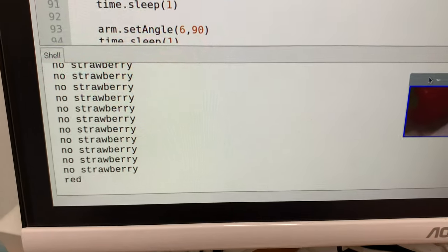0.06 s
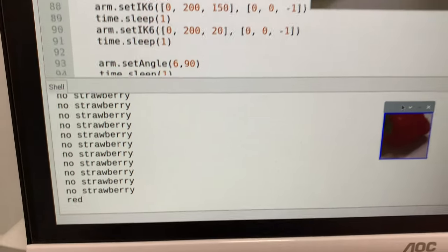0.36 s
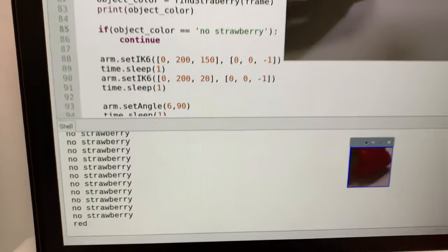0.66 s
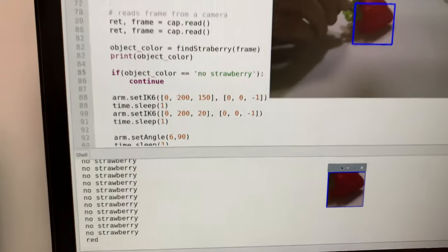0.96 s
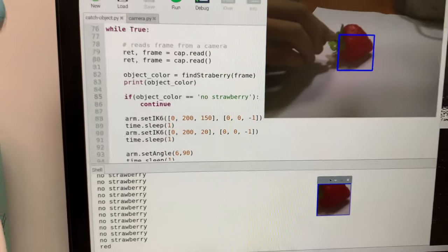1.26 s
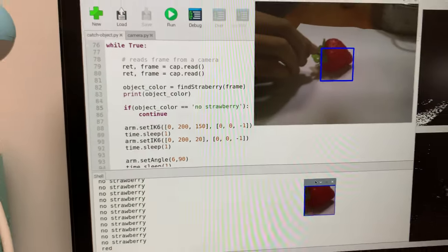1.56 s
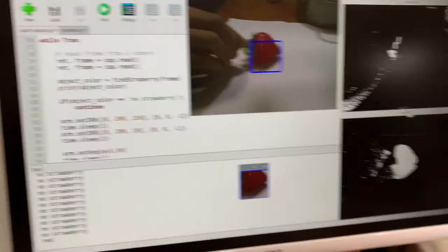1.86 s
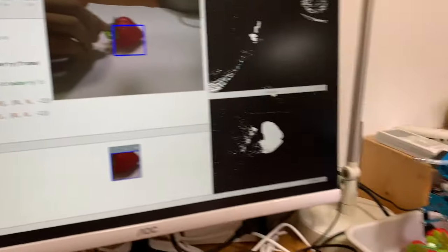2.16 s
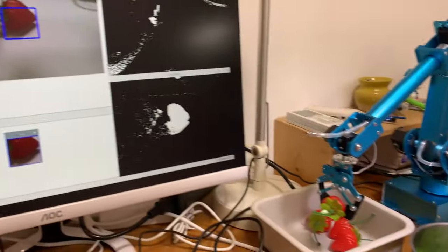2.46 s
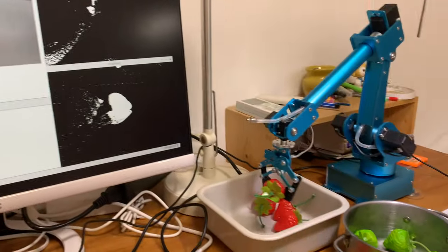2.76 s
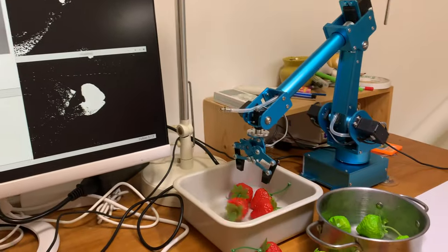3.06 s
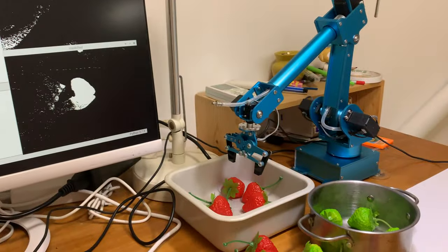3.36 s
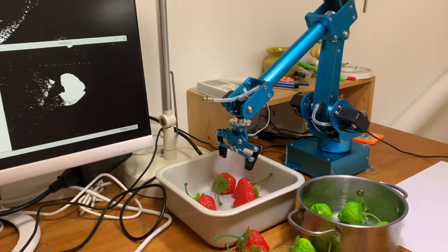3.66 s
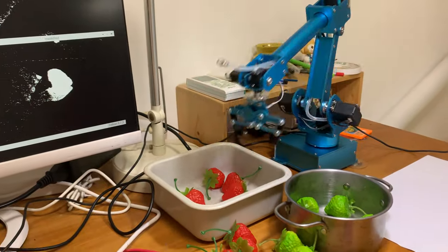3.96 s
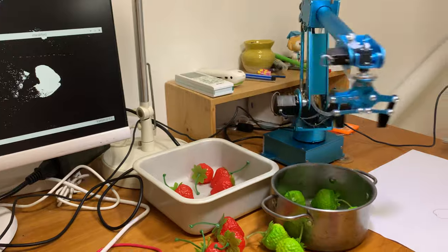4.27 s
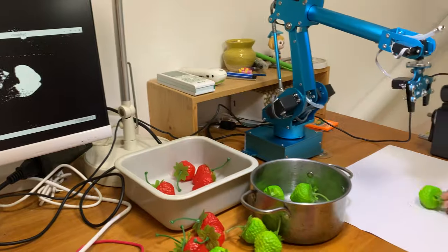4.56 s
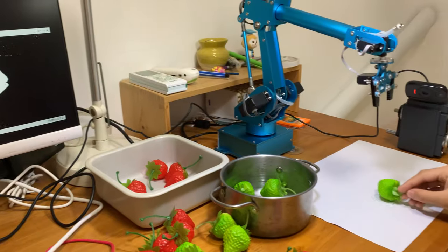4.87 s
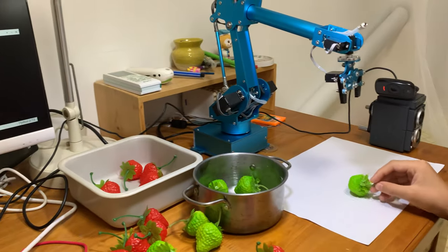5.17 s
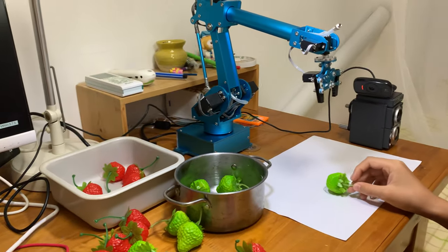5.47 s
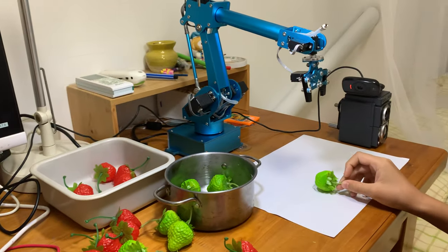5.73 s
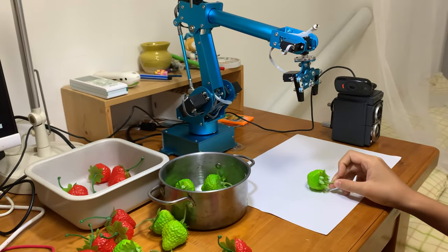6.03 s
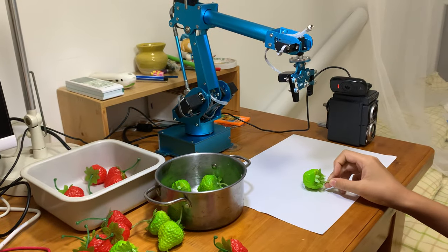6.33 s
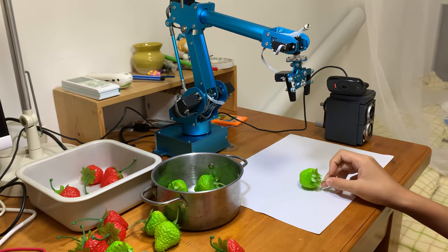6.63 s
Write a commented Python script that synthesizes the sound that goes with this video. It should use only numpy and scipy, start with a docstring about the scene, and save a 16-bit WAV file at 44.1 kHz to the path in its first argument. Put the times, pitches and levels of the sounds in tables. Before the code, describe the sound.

Small servo motors rasp and whine in three quick spurts as a metal robot arm moves on a desk, heard through a hand-held microphone over a steady indoor hum. A toy strawberry then lands in a plastic tub, the loudest sound, bouncing and rocking briefly. A fourth whir ends in a clunk from the arm's joints. After that the small room just hums, with thin, barely audible whistles from the motors.

```python
"""A small room with a low electric hum, where a small metal robot arm on a desk moves in four bursts.
Tooth impacts make its servo gears rasp, harmonics of the mesh rate make them whine, and servos holding
a load whistle faintly. The gripper opens and drops a toy strawberry into a plastic tub, which rings
over a low thump from the desk; the last swing ends in a clunk as the slack in the joints closes. Midway
the hand-held microphone turns towards the arm, with a soft brush of sleeve."""
import sys
import numpy as np
from scipy import signal
from scipy.fft import rfft, irfft, next_fast_len
from scipy.io import wavfile
from scipy.ndimage import uniform_filter1d

SR = 44100
rng = np.random.default_rng(int(sys.argv[2]) if len(sys.argv) > 2 else 0)


def bounce(signal):
    """Save signal as a 16-bit WAV file at the path given by the first command-line argument."""
    frames = np.transpose(np.atleast_2d(signal))
    limited = np.clip(frames, -1, 1)
    pcm = np.round(limited * 32767).astype(np.int16)
    wavfile.write(sys.argv[1], SR, pcm)


N = 304290
TIME = np.arange(N) / SR


def gain_of(db):
    """Amplitude ratio: a factor of ten for every 20 dB."""
    return 10 ** (np.asarray(db) / 20)


def unit_rms(x):
    """Normalisation to unit mean power."""
    return x / np.sqrt(np.mean(x ** 2) + 1e-20)


def curve(points, hz, column=1):
    """Interpolation of a table column on a logarithmic frequency axis."""
    table = np.transpose(points)
    return np.interp(np.log(hz + 1), np.log(table[0] + 1), table[column])


def add(mix, start, sound):
    """Superposition: a sound joins the mix at its start time."""
    part = mix[max(round(start * SR), 0):][:len(sound)]
    part += sound[:len(part)]


def colour(x, points, column=1):
    """Linear filtering: the spectrum is multiplied by a tabulated response."""
    size = next_fast_len(x.shape[-1] + 2048)
    response = gain_of(curve(points, np.fft.rfftfreq(size, 1 / SR), column))
    return irfft(rfft(x, size) * response, size)[..., :x.shape[-1]]


def drift(hz, size):
    """Random modulation: Gaussian noise of rms near 1, rolled off above hz."""
    f = np.fft.rfftfreq(next_fast_len(size + SR), 1 / SR)
    white = rfft(rng.standard_normal(2 * len(f) - 2))
    return unit_rms(irfft(white * np.exp(-(f / hz) ** 2)))[:size]


def ring(modes, rise_s=0.00021):
    """Free vibration: a struck body sounds as a sum of damped sinusoids, here scaled to peak 1."""
    t = np.arange(SR // 4) / SR
    sound = sum(gain_of(db - 60 * t / t60) * np.sin(2 * np.pi * hz * t) for hz, db, t60 in modes)
    sound *= 1 - np.exp(-t / rise_s)
    return sound / abs(sound).max()


def burst(spectrum, t60, rise_s=0.00017):
    """Modal overlap: countless close modes merge into decaying noise."""
    t = np.arange(SR // 4) / SR
    envelope = gain_of(-60 * t / t60) * (1 - np.exp(-t / rise_s))
    return colour(rng.standard_normal(len(t)) * envelope, spectrum)


# Room noise spectra facing a monitor and facing the arm: f/Hz, relative spectral level/dB
NOISE_AT_MONITOR = [(20, -28.5), (50, -9), (100, 1.5), (170, -3), (240, -14), (295, 0), (350, -16),
                    (430, -10), (620, -17.5), (1200, -23), (2500, -40.5), (5000, -51.5), (11500, -48.5),
                    (14000, -61.5)]
NOISE_AT_ARM = [(20, -46.5), (50, -1.5), (110, -1), (155, -12), (200, 1.5), (290, -3), (400, -10.5),
                (620, -17), (1200, -22.5), (2500, -43.5), (5000, -55), (11000, -51.5), (13800, -47.5),
                (15500, -51)]
# Likeness of the noise at left and right: f/Hz, coherence
COHERENCE = [(60, 0.84), (130, 0.85), (290, 0.68), (640, 0.37), (1410, 0.41), (3100, 0.071), (6820, 0.11),
             (15000, 0.53)]
# Noise contours, early and late: t/s, relative rumble level/dB, relative rush level/dB
NOISE_LEVELS = [
    [(0.0, -43, -59), (1.4, -45.5, -61.5), (1.75, -47, -59.5), (2.46, -45, -56.5), (2.84, -48.5, -61),
     (3.0, -49.5, -59)],
    [(4.85, -46, -56.5), (5.05, -44, -57.5), (5.614, -47.5, -59), (5.936, -43.5, -58),
     (6.158, -46.5, -59.5), (6.8, -46, -58)],
]
# Equipment hum: f/Hz, level facing the monitor/dB, level facing the arm/dB
HUM_LINES = [(50.6, -60.5, -66.5), (118, -58, -56), (256.7, -63, -53), (364, -65, -65.5)]


def room_noise(turn_start_s=1.81, turn_length_s=2.8, split_hz=470, wander_hz=2.497, waver_db=4):
    """Partly coherent noise and a line spectrum of hum change colour as the microphone turns."""
    turned = np.clip((TIME - turn_start_s) / turn_length_s, 0, 1)
    hz = np.fft.rfftfreq(N, 1 / SR)
    coherence = curve(COHERENCE, hz)
    low = 1 / (1 + (hz / split_hz) ** 8)
    times, rumble_db, rush_db = np.concatenate(NOISE_LEVELS).T
    out = np.zeros((2, N))
    for spectrum, share in ((NOISE_AT_MONITOR, 1 - turned), (NOISE_AT_ARM, turned)):
        left, independent = rfft(rng.standard_normal((2, N)))
        right = coherence * left + np.sqrt(1 - coherence ** 2) * independent
        noise = np.array([left, right]) * gain_of(curve(spectrum, hz))
        for band, db in ((low, rumble_db + 1), (1 - low, rush_db + 2)):
            out += np.sqrt(share) * gain_of(np.interp(TIME, times, db)) * unit_rms(irfft(noise * band, N))
    for f, monitor_db, arm_db in HUM_LINES:
        cycles = np.cumsum(f + wander_hz * drift(8, N)) / SR
        db = monitor_db + (arm_db - monitor_db) * turned + waver_db * drift(4, N)
        out += gain_of(db) * unit_rms(np.sin(2 * np.pi * cycles))
    return out * gain_of([[-.4], [.4]])


def tooth_impacts(cycles, slide=0.38, decay_cycles=.3, spread_db=3):
    """Impact and sliding friction: an envelope in which each tooth strikes with its own force."""
    forces = gain_of(spread_db * rng.standard_normal(int(cycles[-1]) + 1))
    return unit_rms(slide + forces[cycles.astype(int)] * np.exp(-(cycles % 1) / decay_cycles))


def mesh_harmonic(order, cycles):
    """Phase modulation: uneven tooth spacing smears a harmonic in proportion to its order."""
    smear = .085 * order * drift(300, len(cycles))
    return np.sqrt(2) * np.cos(2 * np.pi * (order * cycles + rng.random()) + smear)


def shifting_contact(x, depth_db=3.6, width_hz=520, length_s=0.065):
    """Time-varying excitation: shifting tooth contact favours changing patches of the spectrum."""
    spectra = signal.stft(x, SR, nperseg=512, noverlap=384)[2]
    patches = uniform_filter1d(rng.standard_normal(spectra.shape), int(width_hz * 512 / SR), axis=0)
    patches = uniform_filter1d(patches, int(length_s * SR / 128), axis=1)
    spectra *= gain_of(depth_db * unit_rms(patches))
    return signal.istft(spectra, SR, nperseg=512, noverlap=384)[1][:len(x)]


# Tone colour of the servo rasp as heard: f/Hz, gain/dB
RASP_COLOUR = [(400, -33), (1500, -14), (1950, 5), (2500, -5.5), (3200, 1.5), (3700, -14), (4250, -9.5),
               (4700, -6), (5400, -2.5), (7000, 3), (8500, -3.5), (10600, 5), (12500, -2), (15800, -4)]


def gear_rasp(cycles, harmonics_db=-2):
    """Source and filter: tooth noise and wavering high mesh harmonics share one tone colour."""
    harmonics = sum(gain_of(4 * drift(20, len(cycles))) * mesh_harmonic(k, cycles) for k in range(4, 16))
    grit = shifting_contact(rng.standard_normal(len(cycles))) * tooth_impacts(cycles)
    source = unit_rms(grit) + gain_of(harmonics_db) * unit_rms(harmonics)
    return unit_rms(colour(source, RASP_COLOUR))


# Partials of the whine: harmonic order, relative level/dB
WHINE_HARMONICS = [(2, -3.5), (3, 4.5), (4, -12), (5, -17.5)]


def gear_whine(cycles, harmonics=WHINE_HARMONICS, shimmer_db=1.5, shimmer_hz=39):
    """Periodic forcing: meshing teeth radiate harmonics of the mesh rate, each wavering in level."""
    return unit_rms(sum(gain_of(db + shimmer_db * drift(shimmer_hz, len(cycles))) * mesh_harmonic(k, cycles)
                        for k, db in harmonics))


# Moves of the arm: start t/s, run-up/s, braking t/s, rasp level/dB, whine level/dB, fractional flutter
ARM_MOVES = [(-.08, 0.026, 0.18, -42.5, -62, 0.03), (.88, 0.067, 1.595, -42, -56, .013),
             (1.88, 0.044, 2.081, -46, -80, 0.0344), (3.877, 0.054, 4.574, -41.5, -54.5, 0.0166)]
# Gear mesh rate, in three stretches: t/s, f/Hz
MESH_RATE = [
    [(.03, 981), (.09, 917), (.15, 981), (.21, 926)],
    [(0.95, 1026), (1.006, 1075), (1.09, 968.6), (1.15, 968), (1.2, 949), (1.24, 999), (1.29, 957),
     (1.335, 965), (1.375, 1065), (1.45, 1055), (1.504, 1032), (1.57, 1056), (1.63, 1002)],
    [(3.99, 1058), (4.026, 1053), (4.05, 950), (4.15, 1039), (4.24, 1045), (4.285, 1092), (4.33, 1087),
     (4.39, 1075), (4.414, 1011), (4.458, 1032), (4.488, 956), (4.57, 1008)],
]


def servo(start, run_up, brake, rasp_db, whine_db, flutter, settle_s=.15, stop_s=.12, spin_down_s=.5):
    """Gear noise: rasp and whine share one mesh rate, which flutters most at starting and braking."""
    t = np.arange(max(start, 0), brake + stop_s, 1 / SR)
    braking_s = np.maximum(t - brake, 0)
    mesh_hz = np.interp(t, *np.concatenate(MESH_RATE).T) * np.exp(-braking_s / spin_down_s)
    effort_db = -36 * np.clip(1 - (t - start) / run_up, 0, None) - 271 * braking_s
    rasp_gain = gain_of(rasp_db + effort_db + gear_catches(t) + 1.52 * drift(68, len(t)))
    # The whine enters after the rasp and fades just before the brake.
    faded = np.clip(1 - np.minimum((t - start) / .089, (brake - t) / .04), 0, 1)
    whine_gain = gain_of(whine_db + 1.1 * effort_db - 21.5 * faded)
    unsettled = np.clip(np.maximum(1 - ((t - start) / settle_s) ** 2, braking_s / stop_s), 0, 1)
    cycles = np.cumsum(mesh_hz * (1 + (flutter + .03 * unsettled) * drift(220, len(t)))) / SR
    wobble = 1 + .098 * np.cos(2 * np.pi * cycles / 10)  # the pinion runs slightly off centre
    gears = rasp_gain * gear_rasp(cycles) + whine_gain * gear_whine(cycles) + squeals(t, cycles)
    return t[0], wobble * gears


# Runs of a second joint: start t/s, end t/s, mesh f/Hz, level/dB
SLOW_MOVES = [(0, 0.224, 858, -56), (1.925, 2.09, 819, -58), (3.949, 4.106, 838, -51)]
# Partials of its whine: harmonic order, relative level/dB
SLOW_HARMONICS = [(2, -7), (3, -4), (4, 1.5), (5, -5.5), (6, 1.5), (8, -3)]


def slow_joint(start, end, mesh_hz, db, flutter=0.0338):
    """Amplitude modulation: deep swings in each harmonic make a slower gear train stutter."""
    size = int((end - start) * SR)
    cycles = np.cumsum(mesh_hz * (1 + flutter * drift(150, size))) / SR
    tone = gear_whine(cycles, SLOW_HARMONICS, shimmer_db=5, shimmer_hz=45)
    return start, gain_of(db) * tone * signal.windows.tukey(size, .2)


# Holding tones of the servos: start t/s, end t/s, f/Hz, level/dB, fractional pitch waver
HOLDING_TONES = [(0.467, 0.585, 4200, -79, 0.0088), (3.325, 3.764, 3877, -80.5, 0.0077),
                 (3.748, 3.975, 1984, -61.5, 0.089), (3.747, 3.93, 2850, -75, 0.068),
                 (3.748, 3.93, 4080, -73.5, 0.094), (4.844, 5.7, 4310, -89.5, 0.088),
                 (5.05, 5.62, 3834, -83.5, 0.013), (6.48, 6.86, 3700, -89, 0.023),
                 (6.519, 6.88, 4280, -89.5, 0.0257), (6.673, 6.727, 1900, -63.5, 0.0077),
                 (6.727, 6.89, 1914, -75.5, 0.017)]


def whistle(start, end, hz, db, waver, flutter_db=4):
    """Frequency and amplitude modulation: a servo holding its load gives a thin, unsteady tone."""
    size = int((end - start) * SR)
    cycles = np.cumsum(hz * (1 + waver * drift(142, size))) / SR
    tone = np.sin(2 * np.pi * cycles) * gain_of(flutter_db * drift(34.83, size))
    return start, gain_of(db) * unit_rms(tone * signal.windows.tukey(size, .25))


# Single tooth clicks: t/s, level/dB
TOOTH_CLICKS = [(.888, -58), (2.21, -47.5)]
# Hard plastic meeting plastic: f/Hz, relative level/dB
TICK_SPECTRUM = [(500, -14), (2000, -6.5), (4000, -8.5), (6000, -3.5), (10000, -0.5), (14000, 2.5),
                 (15800, 0.5)]


def tooth_clicks():
    """Brief contact has a broad spectrum: a tooth clicks as a move starts or settles."""
    out = np.zeros(N)
    for start, db in TOOTH_CLICKS:
        add(out, start, gain_of(db) * burst(TICK_SPECTRUM, t60=.032))
    return out


# Catches of the gears: release t/s, depth of sag/dB, height of surge/dB
GEAR_CATCHES = [(.975, -1, 9), (1.045, 15, 5), (1.112, 5, 2), (1.215, 21, 2.5), (1.925, -4, 1.5),
                (3.995, 0, 6.5), (4.128, -1.5, 5), (4.262, 1.5, 4), (4.398, 10, 1.5), (4.465, 3, 4)]


def gear_catches(t, half_width_s=0.016):
    """Stick and slip: the change in rasp level, in dB, as loaded gears catch and then surge free."""
    db = np.zeros(len(t))
    for release, sag_db, surge_db in GEAR_CATCHES:
        offset = (t - release) / half_width_s
        db += np.where(offset < 0, sag_db, surge_db) * offset * np.exp((1 - offset ** 2) / 2)
    return db


# Harmonics that sing out under load: start t/s, end t/s, harmonic order, level/dB
LOAD_SQUEALS = [(0.967, 1.05, 3, -47.5), (1.03, 1.158, 6, -51), (0.96, 1.169, 2, -54),
                (1.099, 1.375, 2, -55.5), (1.11, 1.15, 6, -41), (1.332, 1.484, 3, -40.5),
                (1.356, 1.45, 2, -48), (1.363, 1.454, 5, -54), (1.523, 1.597, 3, -50.5),
                (4.12, 4.272, 3, -43.5), (4.132, 4.175, 7, -59), (4.135, 4.24, 2, -48.5),
                (4.246, 4.386, 3, -49.5), (4.251, 4.346, 2, -53.5), (4.26, 4.348, 5, -49.5),
                (4.263, 4.354, 6, -54), (4.28, 4.34, 4, -53), (4.493, 4.551, 3, -51.5)]


def squeals(t, cycles, shimmer_db=3):
    """Forced vibration: single harmonics swell out of the whine and follow its pitch."""
    out = np.zeros(len(t))
    for start, end, order, db in LOAD_SQUEALS:
        swell = np.sin(np.pi * np.clip((t - start) / (end - start), 0, 1)) ** 2
        out += gain_of(db) * np.sqrt(np.minimum(2 * swell, 1)) * mesh_harmonic(order, cycles)
    return out * gain_of(shimmer_db * drift(60, len(t)))


# Brushing cloth: f/Hz, relative level/dB
CLOTH_SPECTRUM = [(300, -8), (900, 1), (2400, -9), (4500, -13), (7000, -17), (12000, -24)]


def sleeve(start=2.3, end=2.93, level_db=-68, uneven_db=2):
    """Friction noise: a sleeve brushes softly as the hand turns the microphone."""
    size = int((end - start) * SR)
    brush = unit_rms(colour(rng.standard_normal(size), CLOTH_SPECTRUM))
    brush *= gain_of(level_db + uneven_db * drift(12, size))
    return start, brush * signal.windows.tukey(size, .5)


# Thin rasp of the light gripper servo: f/Hz, relative level/dB
GRIPPER_SPECTRUM = [(400, -26.5), (1000, -14.5), (3000, -9.5), (7000, -9.5), (8400, 0), (10500, -15),
                    (12500, 1), (14500, 5), (15800, 1)]


def gripper(start=2.958, end=3.09, rise_s=0.089, level_db=-46, mesh_hz=1400):
    """Modulated noise: tooth impacts pulse at the mesh rate while the jaws open."""
    t = np.arange(0, end - start, 1 / SR)
    swell = np.minimum(t / rise_s, 1) * signal.windows.tukey(len(t), .1)
    grit = rng.standard_normal(len(t)) * tooth_impacts(mesh_hz * t)
    return start, gain_of(level_db) * swell * unit_rms(colour(grit, GRIPPER_SPECTRUM))


# The strawberry lands, bounces and rocks: t/s, level/dB, contact hardness (0-1)
LANDINGS = [(3.093, -14.5, .6), (3.1029, -23, 1), (3.105, -1, 0.47), (3.111, -17.5, 0), (3.154, -25, 0.2),
            (3.178, -10.5, 0.22), (3.1842, -23.5, .1), (3.193, -20, 0.15), (3.221, -23, 0.16),
            (3.315, -34.5, 0), (3.336, -31.5, 0.05), (3.549, -33, 0), (3.668, -44, 0), (3.722, -34.5, 0.01),
            (3.758, -36, 0), (3.791, -39, 0.14)]
# Ringing of the tub, with a low thump from the desk under it: f/Hz, relative level/dB, T60/s
TUB_AND_DESK = [(245, -20.5, .22), (528, -9.5, 0.085), (637, -7, 0.021), (725, -6, 0.052), (806, 2, 0.029),
                (979, -7, 0.083), (1096, -6, .04), (1225, -6.5, .035), (1405, -11, .025),
                (1930, -15.5, .07), (2385, -19, 0.078), (2590, -22.5, 0.083), (2774, -22.5, .09),
                (3960, -18, 0.044)]
# Dense, quickly damped modes of the tub's plastic walls: f/Hz, relative level/dB
WALL_SPECTRUM = [(200, -31), (400, -18), (550, -1), (1000, 7), (1700, -7.5), (2700, -5.5), (4300, -8),
                 (5500, -20), (9000, -22)]


def strawberry(lag_s=0.0013, lowest_hz=330):
    """Impact on a shell: a hard contact ticks, then slower bending waves sound in the tub and desk."""
    out = np.zeros(N)
    for start, db, hardness in LANDINGS:
        add(out, start, hardness * gain_of(db - 3) * burst(TICK_SPECTRUM, t60=.008))
        body = ring(TUB_AND_DESK) + gain_of(-6) * burst(WALL_SPECTRUM, t60=.066, rise_s=.00083)
        # Gentle touches sound duller; the small tub radiates little bass.
        top_hz = np.clip(14000 * gain_of(.5 * db), 1000, 16000)
        band = signal.butter(2, [lowest_hz, top_hz], "band", fs=SR, output="sos")
        add(out, start + lag_s, gain_of(db) * signal.sosfilt(band, body))
    return out


# Paths from the tub to the microphone ports: f/Hz, left gain/dB, right gain/dB
TUB_PATHS = [(500, 0.5, 1.5), (1000, 2, 0.5), (2000, 2.5, 3), (4000, 0, 2.5), (10000, 3, 3)]


def tub_paths(left, right):
    """Transfer functions: each port receives the tub with its own colour."""
    return np.array([colour(left, TUB_PATHS, column=1), colour(right, TUB_PATHS, column=2)])


# Modes of the arm's links: f/Hz, relative level/dB, T60/s
ARM_MODES = [(130, -24, .2), (290, -20, .1), (400, -19, .06), (495, -13, .06), (620, -17, .04),
             (800, -12, .04), (1170, -6, .025), (1430, -1, .02), (1530, -3, .02), (1720, -4, .02),
             (2090, -3, .024), (2880, -9, .013)]
# Loose washers and wires: f/Hz, relative level/dB
RATTLE_SPECTRUM = [(200, -2.5), (600, 2), (1400, 3), (2300, 0), (3200, -13), (4200, -21), (8000, -12.5)]


def clunk(start=4.578, level_db=-17, rebound_s=0.012, loss_db=4):
    """Backlash: joint slack closes in four weakening blows that ring the links and shake loose parts."""
    out = np.zeros(N)
    for k in range(4):
        blow = ring(ARM_MODES) + gain_of(-2) * burst(RATTLE_SPECTRUM, t60=.064, rise_s=.0008)
        add(out, start + k * rebound_s, gain_of(level_db - loss_db * k ** 2) * blow)
    return out


# Reverberation time of the room: f/Hz, T60/s
ROOM_DECAY = [(150, 0.55), (500, 0.23), (1200, 0.28), (3000, 0.42), (7000, .29), (15000, 0.23)]


def room(x, wet_db, gap_s=0.0048):
    """Reverberation: dense reflections follow the direct sound, each band decaying at its own rate."""
    shape = (2, SR * 2 // 3)
    reflections = rng.standard_normal(shape) * (rng.random(shape) < .12)
    hz, t, spectra = signal.stft(reflections, SR, nperseg=256)
    decay = gain_of(-60 * t / curve(ROOM_DECAY, hz)[:, None])
    response = signal.istft(spectra * decay, SR, nperseg=256)[1]
    response[:, :int(gap_s * SR)] = 0
    response *= gain_of(wet_db) / np.linalg.norm(response, axis=1, keepdims=True)
    response[:, 0] += 1  # direct sound
    response /= np.sqrt(1 + gain_of(wet_db) ** 2)  # power is conserved
    return signal.fftconvolve(x[None], response, axes=1)[:, :x.size]


def scene():
    """Superposition: servos, sleeve, tub and knocks reverberate over the room's noise."""
    movement = np.zeros(N)
    for source, table in ((servo, ARM_MOVES), (slow_joint, SLOW_MOVES), (whistle, HOLDING_TONES)):
        for row in table:
            add(movement, *source(*row))
    add(movement, *gripper())
    add(movement, *sleeve())
    tub = tub_paths(*room(strawberry(), wet_db=-4))
    movement = room(movement, wet_db=1) * gain_of([[-.5], [.5]])
    knocks = room(clunk() + tooth_clicks(), wet_db=-1.5)
    return movement + tub + knocks + room_noise()


# Response of the two microphone ports: f/Hz, sum gain/dB, difference gain/dB
PORT_RESPONSE = [(15, -11, -14), (45, 0.5, -6), (200, 0.5, -1), (500, -1.5, 0.5), (2003, -2.5, 2),
                 (4594, 0.5, 1.5), (7060, -0.5, -0.5), (8500, 4, -9), (10500, 1, -5), (13500, 1, -13.5),
                 (15500, -2.5, -12)]


def record(dry, edge_hz=15800, lag_s=.000203, lag_above_hz=6100):
    """Mid-side filtering: the ports shed deep bass and narrow the treble; a low-pass limits the band."""
    mid = colour((dry[0] + dry[1]) / 2, PORT_RESPONSE, column=1)
    side = colour((dry[0] - dry[1]) / 2, PORT_RESPONSE, column=2)
    # Group delay: the left port hears the treble slightly late.
    lag_cycles = lag_s * np.maximum(np.fft.rfftfreq(N, 1 / SR) - lag_above_hz, 0)
    left = irfft(rfft(mid + side) * np.exp(-2j * np.pi * lag_cycles), N)
    low_pass = signal.firwin(511, edge_hz, window=("kaiser", 9), fs=SR)
    return signal.oaconvolve(np.array([left, mid - side]), low_pass[None], "same", axes=1)


dry = scene()
out = record(dry)
bounce(out)
```